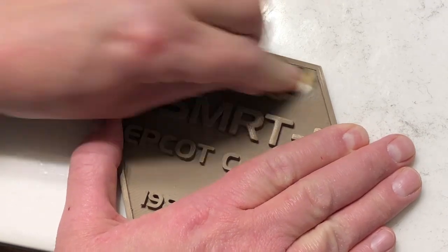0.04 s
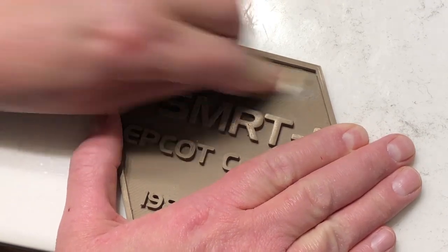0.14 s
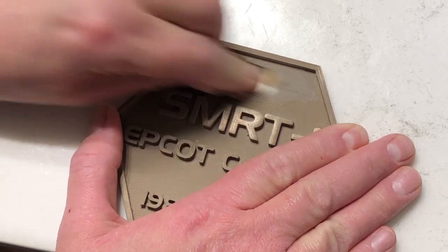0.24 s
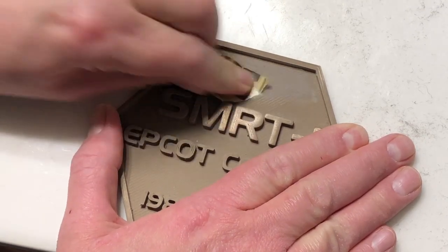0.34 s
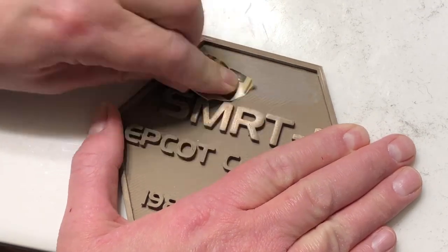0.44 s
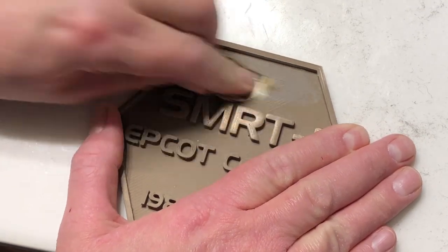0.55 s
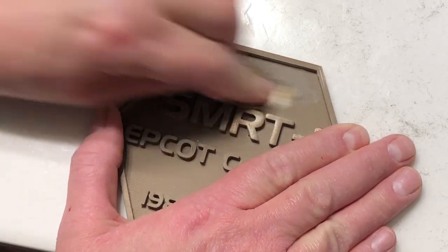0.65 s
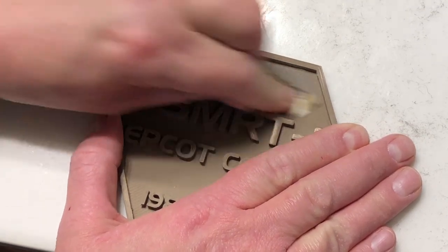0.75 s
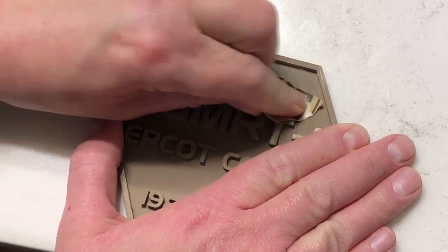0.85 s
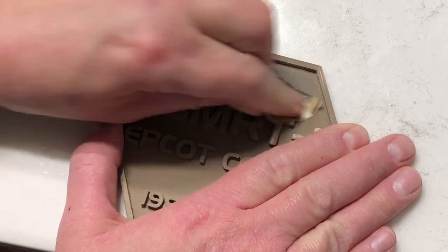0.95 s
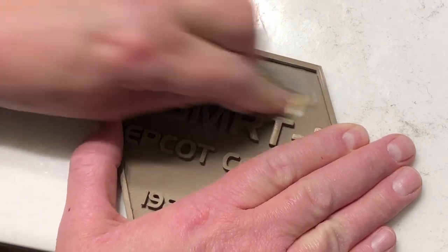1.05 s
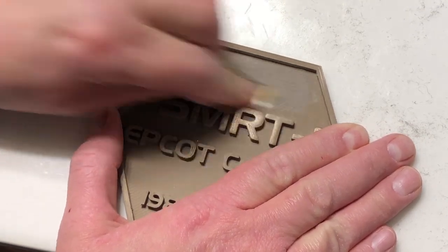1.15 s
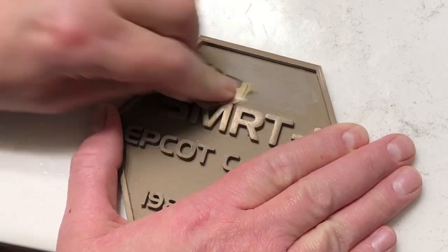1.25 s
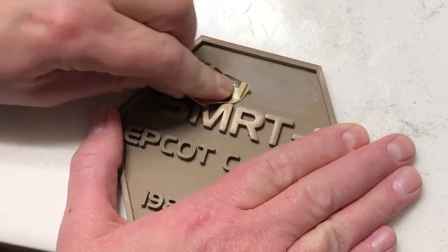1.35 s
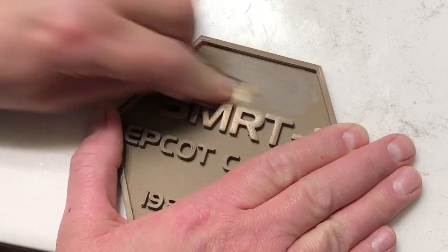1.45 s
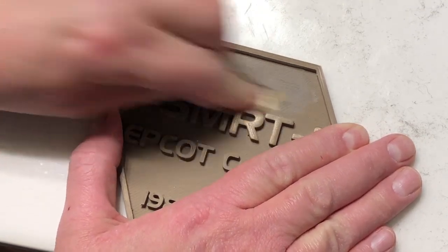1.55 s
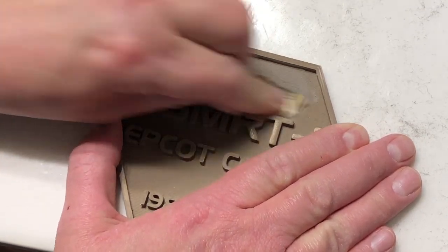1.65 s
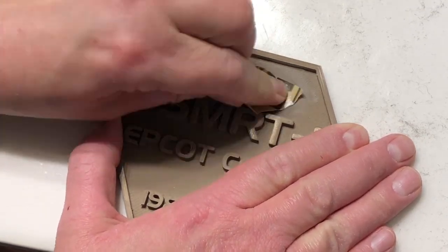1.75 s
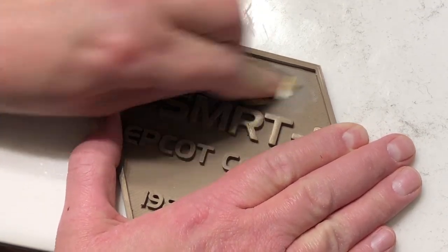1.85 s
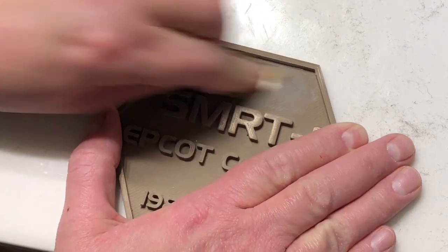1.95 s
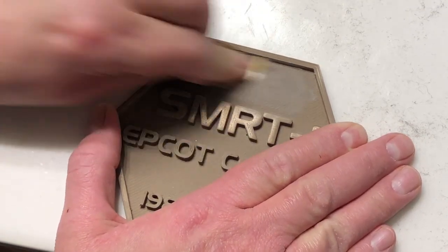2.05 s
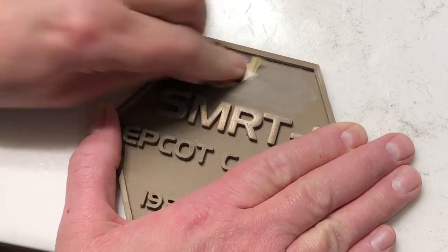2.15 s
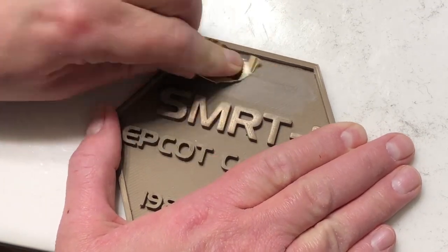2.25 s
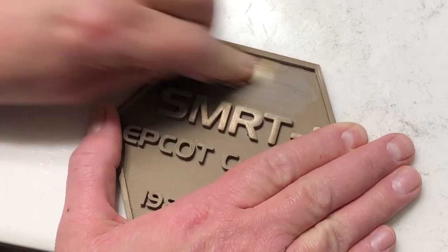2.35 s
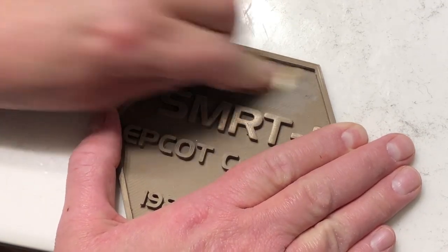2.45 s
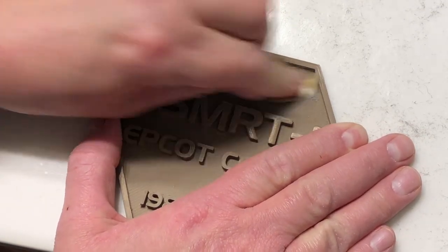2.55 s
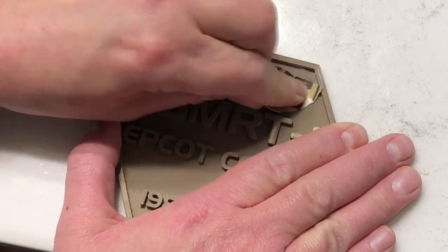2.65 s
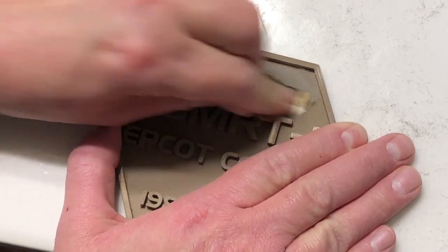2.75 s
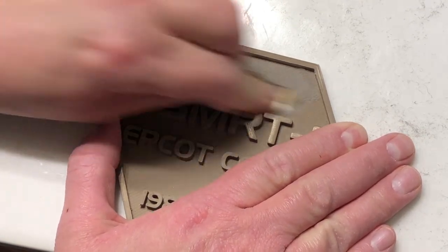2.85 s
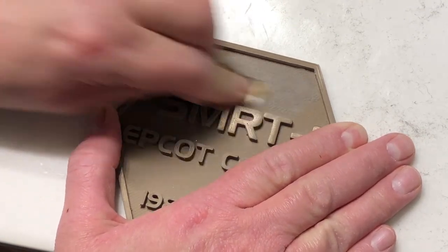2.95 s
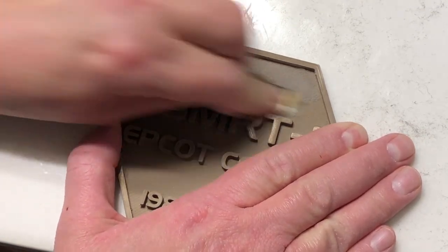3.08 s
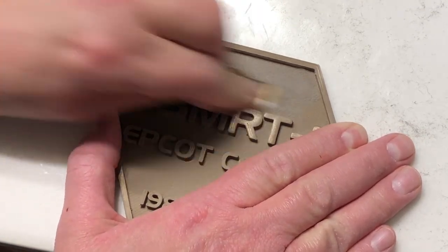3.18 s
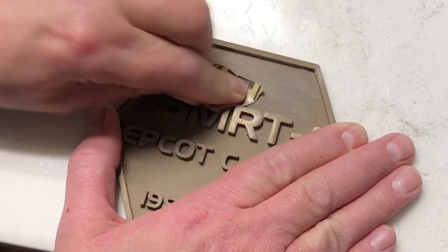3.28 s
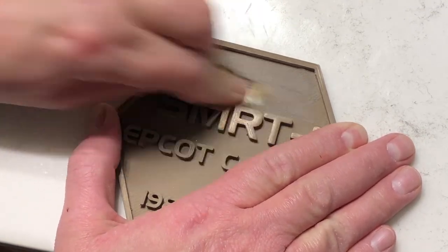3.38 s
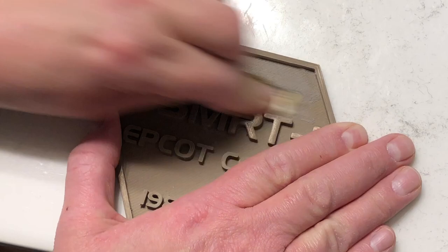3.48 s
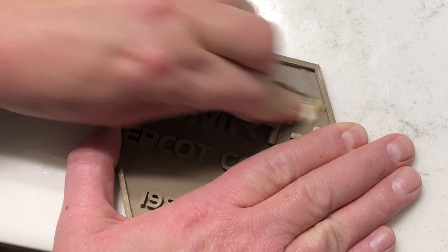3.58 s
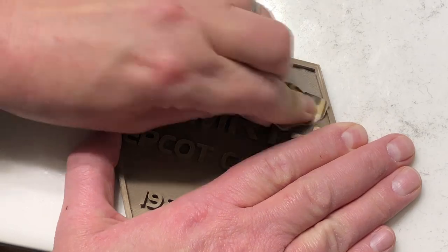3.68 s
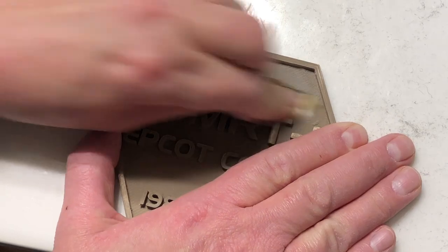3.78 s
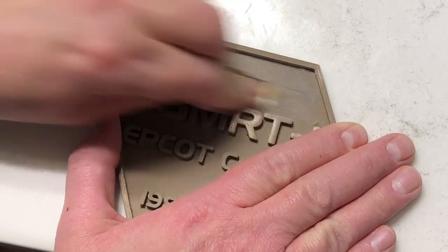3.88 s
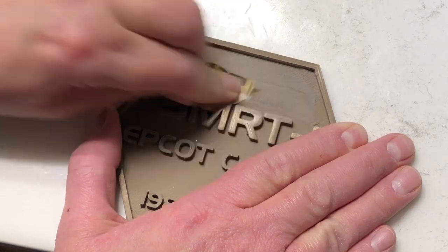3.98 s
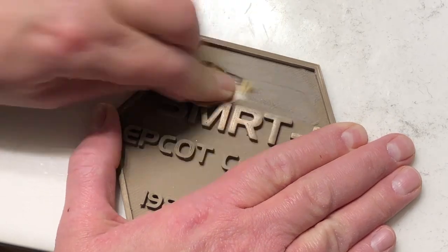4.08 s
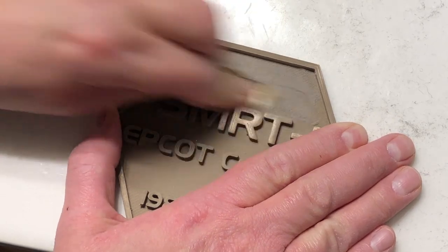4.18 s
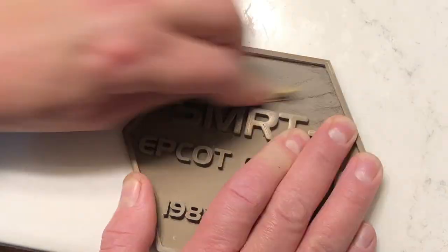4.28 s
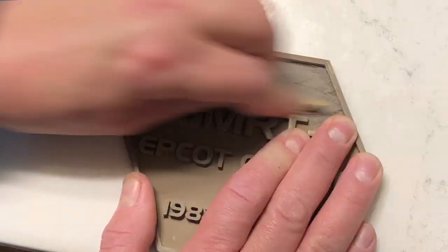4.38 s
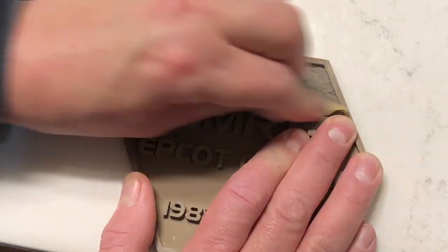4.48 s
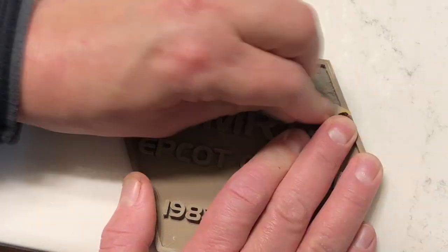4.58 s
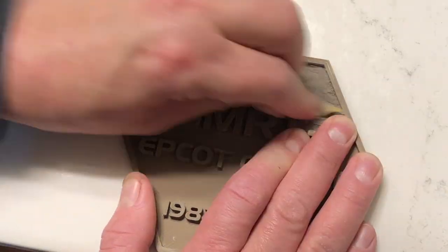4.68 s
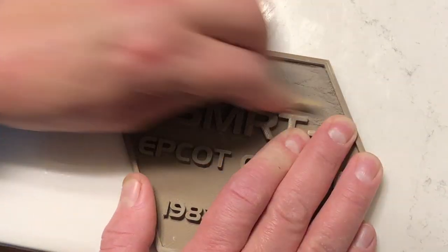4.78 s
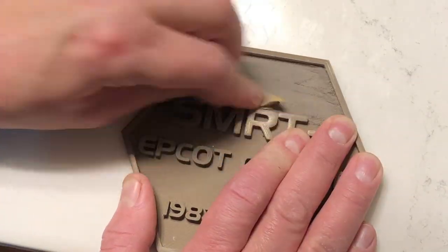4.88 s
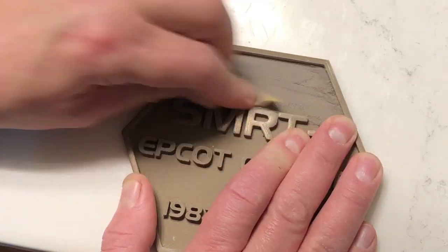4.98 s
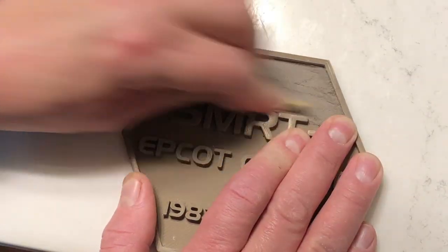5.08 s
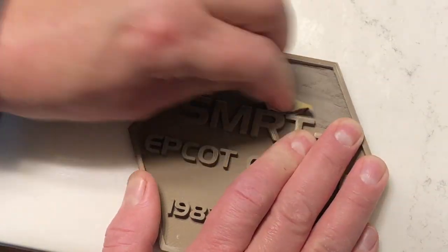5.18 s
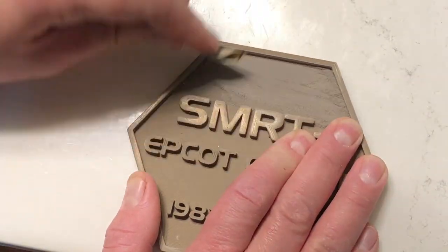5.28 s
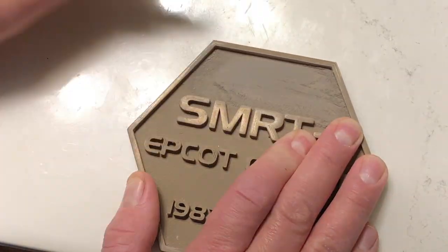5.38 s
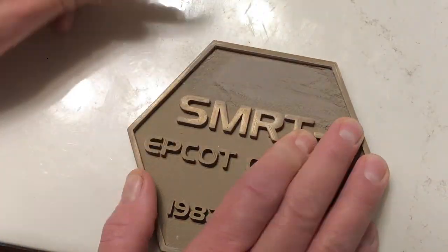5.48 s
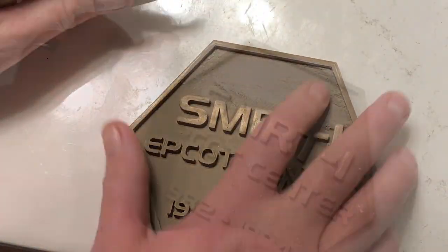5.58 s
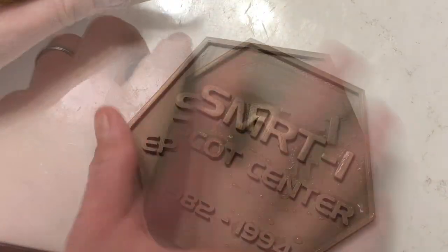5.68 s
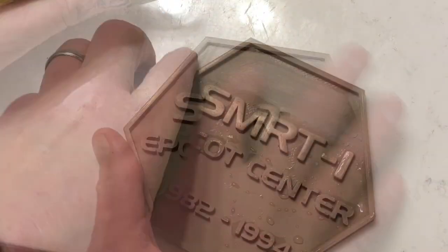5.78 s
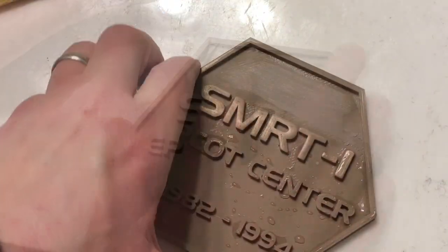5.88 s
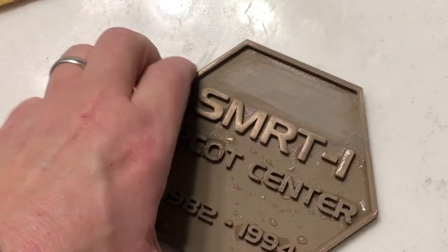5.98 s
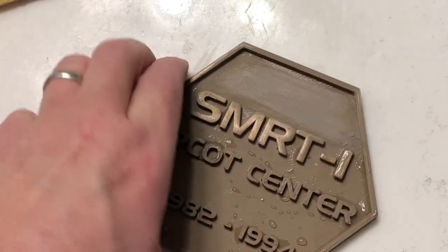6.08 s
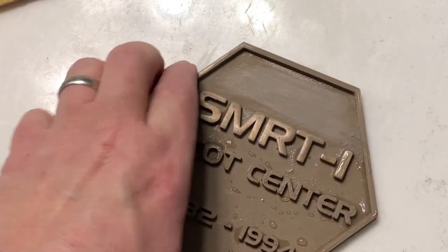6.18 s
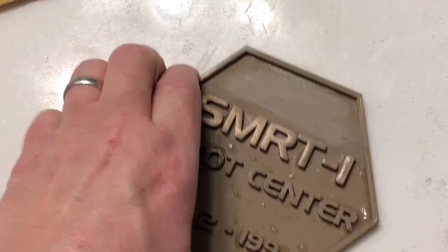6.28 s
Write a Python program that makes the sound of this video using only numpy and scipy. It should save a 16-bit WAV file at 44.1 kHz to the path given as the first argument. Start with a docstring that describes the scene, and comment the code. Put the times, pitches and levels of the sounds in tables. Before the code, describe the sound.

Quick, raspy hand sanding on a small plaque shakes a kitchen counter, then stops for soft wipes and tiny wet ticks.

```python
"""In a kitchen, a fingertip scrubs a scrap of sandpaper to and fro on a resin plaque on the counter.
At about 17 strokes a second, grit scrapes the plaque and makes it ring. Each push shakes the counter,
and now and then the plaque rocks and knocks. The grip changes once; at the end the hand lifts and
wipes the wet plaque with tiny ticks. Behind it all, something like a dishwasher sloshes in slow swells."""
import sys
import numpy as np
from scipy import signal
from scipy.fft import rfft, irfft
from scipy.io import wavfile
from scipy.ndimage import uniform_filter1d

SR = 44100
rng = np.random.default_rng(int(sys.argv[2]) if len(sys.argv) > 2 else 0)


def transcribe(u):
    """Save the signal u as a 16-bit wav file named by the first command-line argument.

    u: samples, shape (n,) or (channels, n), limited to [-1, 1]; the rate is SR.
    q: integer samples, one column per channel.
    """
    v = np.clip(np.atleast_2d(u).T, -1, 1)
    q = np.round(v * 32767).astype(np.int16)
    wavfile.write(sys.argv[1], SR, q)


N = 279153
TIME = np.arange(N) / SR
FREQS = np.fft.rfftfreq(N, 1 / SR)


def undb(db):
    """Turn decibels into a number to multiply by."""
    return 10 ** (np.asarray(db) / 20)


def unit(x):
    """Scale a sound to an average (rms) size of 1."""
    return x / np.sqrt(np.mean(x ** 2))


def curve(rows):
    """A changing volume from rows of (time [s], level [dB])."""
    return undb(np.interp(TIME, *np.transpose(rows)))


def colour(x, points, resonances=()):
    """Make some pitches louder than others, with humps where an object rings; the result has size 1."""
    hz, db = np.transpose(points)
    shape = np.interp(np.log(FREQS + 1), np.log(hz), db)
    for centre, width, lift in resonances:
        shape = shape + lift * 2 ** -((2 * (FREQS - centre) / width) ** 2)
    return unit(irfft(rfft(x) * undb(shape), N))


def ring(x, hz, width_hz):
    """Keep the sound near one pitch; the narrower the width, the longer it rings."""
    return signal.lfilter(*signal.iirpeak(min(hz, SR * .45), hz / width_hz, fs=SR), x)


def strike(x, hz, width_hz):
    """A fading note that starts as big as the blow that caused it."""
    return ring(x, hz, width_hz) * SR / (2 * np.pi * width_hz)


def blows(rows):
    """Single sharp taps from rows of (time [s], level [dB])."""
    out = np.zeros(N)
    for s, db in rows:
        out[int(s * SR)] = undb(db)
    return out


def walk(per_second):
    """A smooth random drift, mostly between -1 and 1."""
    hold = max(int(SR / per_second), 1)
    steps = np.repeat(rng.standard_normal(N // hold + 1), hold)[:N]
    return 0.892 * uniform_filter1d(steps, hold)


def grit(per_second, spread_db):
    """A crowd of tiny hits of uneven size."""
    hit = rng.random(N) < per_second / SR
    return unit(hit * rng.standard_normal(N) * undb(spread_db * rng.standard_normal(N)))


# the arm's steady beat, with one hurried pair as the grip changes (time [s], strokes done [count])
STROKE_COUNT = [(.019, 0), (1.029, 18), (1.82, 32), (3.056, 54), (4.334, 76), (4.423, 78), (4.812, 85),
                (5.356, 94)]
# the paper lifts briefly as the grip changes, and for good at the end (time [s], touch [0-1])
PAPER_TOUCH = [(4.325, 1), (4.342, 0.7), (4.364, 0), (4.374, 0.1), (4.39, 0.88), (5.355, 1), (5.385, 0.39),
               (5.412, 0)]
# how hard the finger bears down (time [s], level [dB])
FINGER_PRESSURE = [(0, -26), (.7, -27.5), (1.35, -26.5), (1.79, -27), (1.86, -29), (2.3, -27),
                   (2.75, -27.5), (4.3, -27.5), (4.8, -30.5), (5.08, -28), (5.3, -32)]
# how strongly a push shakes the counter (time [s], level [dB])
PUSH_SHAKE = [(0, -48.5), (1.4, -46.5), (1.9, -48), (4.2, -48.5), (4.45, -51), (5.3, -47.5)]
# pushes that dig in (time [s], extra shaking [dB])
DEEP_PUSHES = [(.61, 3.5), (1.17, 4.5), (1.4, 4)]
PULL_RASP_DB, PULL_SHAKE_DB = 0.7, -6.5  # a pull scrapes a little more and shakes much less
RASP_SCATTER_DB, SHAKE_SCATTER_DB, TURN_SCATTER_S = 0.84, 0.87, .0015  # no two strokes are alike


def motion():
    """The finger swings: gives progress through the stroke (0-1), pulling (0 or 1), force and shake."""
    times, done = np.transpose(STROKE_COUNT)
    turns = np.arange(int(done[-1]) + 1)
    late, rasp_luck, shake_luck = rng.standard_normal((len(turns), 3)).T
    turn_times = np.interp(turns, done, times) + TURN_SCATTER_S * late
    count = np.interp(TIME, turn_times, turns)
    stroke = np.minimum(count.astype(int), turns[-2])
    pulling = stroke % 2
    touch = np.interp(TIME, *np.transpose(PAPER_TOUCH))
    force_db = PULL_RASP_DB * (pulling - .5) + RASP_SCATTER_DB * rasp_luck[stroke]
    dig_db = sum(db * (stroke == stroke[int(s * SR)]) for s, db in DEEP_PUSHES)
    shake_db = dig_db + PULL_SHAKE_DB * pulling + SHAKE_SCATTER_DB * shake_luck[stroke]
    force = touch * uniform_filter1d(curve(FINGER_PRESSURE) * undb(force_db), size=500)
    shake = touch * uniform_filter1d(curve(PUSH_SHAKE) * undb(shake_db), size=500)
    return count % 1, pulling, force, shake


# how a pull changes the scrape's tone; a push does the opposite (pitch [Hz], boost [dB])
PULL_TONE = [(3000, 1), (3900, 1), (4550, -1), (5250, 1), (5600, 0.5), (7200, 2.23), (8300, 1.9),
             (10200, 0), (10900, 1), (12800, -0.1), (14500, 1.07)]
LEAN_DRIFT = .4  # the finger never leans quite the same way twice


def paper_bend(grains, pulling):
    """The paper bends one way on a push and the other on a pull, so its tone swings."""
    pushed = colour(grains, [(hz, -db) for hz, db in PULL_TONE])
    pulled = colour(grains, PULL_TONE)
    share = uniform_filter1d(pulling.astype(float), size=600) + LEAN_DRIFT * walk(12)
    return pushed + share * (pulled - pushed)


# where the fingertip works (time [s], place [0 near the rim, 1 on the open face])
FINGER_PLACE = [(0, 0.14), (.75, 0.11), (1.2, 0.44), (1.8, 0.46), (1.85, 0.1), (2.3, 0.12), (2.85, 0.15),
                (3.0, 0.54), (4.35, 0.57)]
# the scrape's tone near the rim, and on the open face (pitch [Hz], level [dB])
RIM_TONE = [(400, -27), (1000, -23), (1500, -7), (2500, -3.5), (3000, -1), (3600, 3.5), (4700, 7),
            (6200, 10), (7300, 1), (9100, 3), (10400, 3), (11400, 8.5), (12400, 4), (16000, 7.5)]
FACE_TONE = [(400, -28), (1000, -30.5), (1500, -10), (2500, -5.5), (3000, -1.5), (3600, 6), (5600, 5),
             (6500, 6), (7100, 11), (8300, 10.5), (9200, 13.5), (10400, 5), (14300, 9.5), (16000, -0.5)]
# the plaque's ringing notes (pitch [Hz], width [Hz], boost near the rim [dB], boost on the face [dB])
PLAQUE_NOTES = [(3860, 204, 10.5, 11), (4230, 290, 2, 6.5), (4720, 214, 9, 5), (5160, 320, 2, 10.5),
                (5790, 280, 5.5, 1.5), (6226, 230, 5.5, 3)]


def plaque(grains):
    """Grit makes the plaque ring, with a tone that depends on where the flat fingertip presses."""
    place = np.interp(TIME, *np.transpose(FINGER_PLACE))
    rim = colour(grains, RIM_TONE, [(hz, width, lift) for hz, width, lift, _ in PLAQUE_NOTES])
    face = colour(grains, FACE_TONE, [(hz, width, lift) for hz, width, _, lift in PLAQUE_NOTES])
    rasp = (1 - place) * rim + place * face
    # the finger muffles each note differently from stroke to stroke
    for hz, width, *_ in PLAQUE_NOTES:
        rasp = rasp + (undb(2.0 * walk(19)) - 1) * ring(rasp, hz, width)
    return undb(-0.04) * rasp


GRIP_CHANGE_S = 4.368


def sandpaper(progress, pulling, force):
    """Grit scrapes the plaque: louder and brighter at mid-stroke, with a hollow note on the pull."""
    speed = np.sin(np.pi * progress)
    grains = paper_bend(grit(18000 + 22000 * speed, spread_db=1.0), pulling)
    rasp = np.where(TIME < GRIP_CHANGE_S, plaque(grains), paper_edge(grains))
    # the high hiss needs speed; the lower ring lingers while the finger rolls through the turn
    dull = signal.sosfiltfilt(signal.butter(2, 6800, fs=SR, output="sos"), rasp)
    body = dull * (0.87 + 0.24 * speed ** 2) * undb(.5 * walk(35))
    highs = (rasp - dull) * (0.6 + 0.82 * speed ** 2) * undb(1.3 * walk(18))
    hollow = hollow_note() * uniform_filter1d(pulling * np.sqrt(speed), size=400)
    flicker = undb(0.58 * walk(160))
    return force * (body + highs + hollow) * flicker


# the tone of the shaking counter (pitch [Hz], level [dB])
COUNTER_TONE = [(25, -12), (55, -4.5), (110, -4.5), (250, -0.5), (450, -5), (800, -3.5), (920, -6.5),
                (1200, -2.5), (1700, -6), (3000, -16.5)]
# the notes it rings at (pitch [Hz], width [Hz], boost [dB])
COUNTER_NOTES = [(77.5, 11, 14.3), (143, 17, 12), (180.2, 21, 10.3), (563, 69, 7.3), (780, 54, 4.8),
                 (1311, 45, 5.3)]


def counter(progress, pulling, shake):
    """The pushing finger judders and shakes plaque and counter; the pull drags more smoothly."""
    judder = colour(grit(2500, spread_db=1.5), COUNTER_TONE, COUNTER_NOTES)
    push = .5 + 0.66 * np.sin(np.pi * progress)
    pull = 1.15 - 0.54 * progress
    swell = uniform_filter1d(np.where(pulling, pull, push), size=300)
    return undb(0.82) * judder * shake * swell


# the tone of water in the tub (pitch [Hz], level [dB])
WATER_TONE = [(60, -21.5), (150, -7.5), (230, -7), (310, 1), (410, 0.5), (480, -3.5), (650, -6),
              (1000, -18), (2000, -26), (5000, -30)]
# the quiet flow between surges (time [s], level [dB])
QUIET_FLOW = [(0, -62), (5.3, -62), (5.7, -70), (6.33, -70)]
# surges of water (middle time [s], length [s], level [dB])
WATER_SURGES = [(.04, 0.11, -52.5), (.69, .18, -56), (1.573, 0.23, -52.5), (2.073, 0.074, -53.5),
                (2.39, 0.18, -48.5), (3.242, .2, -53.5), (3.91, .18, -50.5), (4.656, 0.22, -48),
                (5.04, 0.16, -51), (5.478, 0.28, -46.5), (5.93, 0.32, -60), (6.35, 0.17, -59)]
SURGE_STEEPNESS = 4.7  # higher makes a surge rise and fall more suddenly


def dishwasher():
    """Water washes round the tub, which throbs at one wavering note; it surges as the spray arm turns."""
    wash = colour(rng.standard_normal(N), WATER_TONE, resonances=[(366, 59, 7.7)])
    note_hz = 377 + 7 * walk(40)
    note = np.sin(2 * np.pi * np.cumsum(note_hz) / SR) * undb(4.1 * walk(45))
    flow = curve(QUIET_FLOW)
    for s, length, db in WATER_SURGES:
        surge = undb(db) * 2 ** -(np.abs(2 * (TIME - s) / length) ** SURGE_STEEPNESS)
        flow = np.hypot(flow, surge)
    return flow * (undb(-2.5) * wash + undb(-2.8) * note)


# how loud the room's hiss is (time [s], level [dB])
HISS_LEVEL = [(0, -73), (5.58, -66), (5.69, -74), (5.75, -65), (5.95, -59.5), (6.12, -63.5), (6.33, -68)]
# its tone (pitch [Hz], level [dB])
HISS_TONE = [(18, -72), (30, -17), (256, -18.5), (379, -11.5), (479, -37), (656, -23.5), (1200, -28),
             (2070, -28), (2690, -32.5), (4190, -30), (7860, -39), (15500, -46)]


def room_hiss():
    """A faint hiss fills the kitchen and swells a little near the end."""
    return curve(HISS_LEVEL) * colour(rng.standard_normal(N), HISS_TONE)


def room_echo(x, fade_s):
    """Sound bounces quickly off counter and hands; the small room's echo then drops 60 dB in fade_s."""
    age = TIME[:SR // 2]
    bounces = rng.standard_normal(len(age)) * np.exp(-age / 0.0048) * (age > .0007)
    tail = rng.standard_normal(len(age)) * undb(-60 * age / fade_s) * (age > .006)
    tail = ring(tail, 1800, 4800)  # the walls soak up the highs
    echo = undb(-15) * bounces / np.linalg.norm(bounces) + undb(-20) * tail / np.linalg.norm(tail)
    return x + signal.fftconvolve(x, echo)[:N]


def thumps(pulling, shake):
    """Every push thumps the counter's lowest note."""
    starts = np.flatnonzero(np.diff(pulling, prepend=1) < 0) / SR
    pushes = blows([(s + 0.005, -23 + 1.3 * rng.standard_normal()) for s in starts])
    pushes *= np.abs(shake) ** 0.43  # a harder push thumps only a little more
    note = strike(pushes, hz=76, width_hz=7.9)
    return ring(note, hz=78.3, width_hz=26)  # the soft finger builds the note up slowly


# how strong the hollow note is next to the scrape (time [s], level [dB])
HOLLOW_STRENGTH = [(0, -16.5), (1.6, -18.5), (4.3, -25), (4.5, -28)]


def hollow_note():
    """Two soft, lower notes ring under the pulled paper; their balance drifts."""
    grains = grit(12000, spread_db=1.5)
    pair = sum(undb(db + 2.5 * walk(12.05)) * ring(grains, hz, width)
               for hz, width, db in [(1858, 120, -3.5), (2030, 140, -0.5)])
    return unit(ring(pair, 2290, 1300)) * curve(HOLLOW_STRENGTH)


# the plaque's blows on the counter (time [s], level [dB])
KNOCK_BLOWS = [(.606, -44.5), (.952, -35), (1.402, -36.5), (1.845, -39), (5.258, -47), (5.283, -35)]
# the notes a knock sets ringing (pitch [Hz], width [Hz], level [dB])
KNOCK_NOTES = [(77, 8.1, -10), (141.3, 9.2, -4), (176, 14, -15.5), (576, 40, -2.5)]


def knocks():
    """Now and then the plaque rocks and knocks on the counter."""
    taps = blows(KNOCK_BLOWS)
    notes = sum(undb(db) * strike(taps, hz, width) for hz, width, db in KNOCK_NOTES)
    return ring(notes, hz=160, width_hz=420)


# the scrape's tone after the grip changes (pitch [Hz], level [dB])
EDGE_TONE = [(400, -20), (950, -11), (1300, -2), (1600, -6), (2000, 3.5), (2500, -5), (3050, 5),
             (5050, 4.5), (5500, 10), (6900, 8.5), (8200, 4), (10500, 4.5), (11400, 6), (16000, 2.5)]


def paper_edge(grains):
    """In the new grip, the paper's edge scrapes along the rim."""
    return undb(-0.25) * colour(grains, EDGE_TONE)


# soft wipes of the hand (middle time [s], length [s], level [dB])
HAND_WIPES = [(5.454, 0.032, -50), (5.513, 0.042, -50.5), (5.559, 0.027, -58), (5.752, 0.045, -54.5),
              (5.883, 0.025, -59), (5.975, 0.033, -68)]


def wipes():
    """The hand brushes away from the plaque, then skin slides over it with a finer hiss."""
    swell = sum(undb(db) * 2 ** -((2 * (TIME - s) / length) ** 2) for s, length, db in HAND_WIPES)
    skin = rng.standard_normal(N)
    brush = colour(skin, [(500, -14), (1900, -9), (3000, 5), (4300, -5),
                          (6300, 0.5), (8500, -6), (15000, -12)])
    slide = colour(skin, [(500, -14), (4000, -5), (7000, 0), (10000, -3), (15000, -5)])
    return swell * np.where(TIME < 5.68, brush, slide)


# tiny wet snaps under the fingers (time [s], strength [dB])
WATER_SNAPS = [(6.057, -52), (6.085, -62), (6.139, -40.5), (6.151, -50), (6.196, -60), (6.206, -51),
               (6.234, -62)]


def wet_ticks():
    """Thin films of water snap: a short crack and a tiny high ring."""
    snaps = blows(WATER_SNAPS)
    age = TIME[:SR // 50]
    crack = rng.standard_normal(len(age)) * np.exp(-age / 0.0022)
    cracks = ring(signal.fftconvolve(snaps, crack)[:N], hz=12000, width_hz=8000)
    return 0.41 * cracks + 0.56 * strike(snaps, 12600, 150) + .25 * strike(snaps, 14900, 260)


def scene():
    """Hand sounds close by, the kitchen behind them."""
    progress, pulling, force, shake = motion()
    hands = sandpaper(progress, pulling, force) + counter(progress, pulling, shake)
    hands += thumps(pulling, shake) + knocks() + wipes() + wet_ticks()
    kitchen = room_hiss() + room_echo(hands, fade_s=0.12) + dishwasher()
    return kitchen[None]  # one channel


TOP_HZ = 15800


def record(dry):
    """The very highest pitches are cut away."""
    return signal.sosfilt(signal.ellip(12, .1, 80, TOP_HZ, fs=SR, output="sos"), dry)


dry = scene()
out = record(dry)
transcribe(out)
```